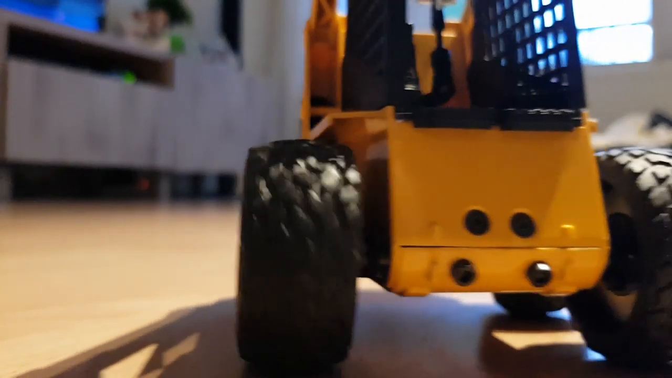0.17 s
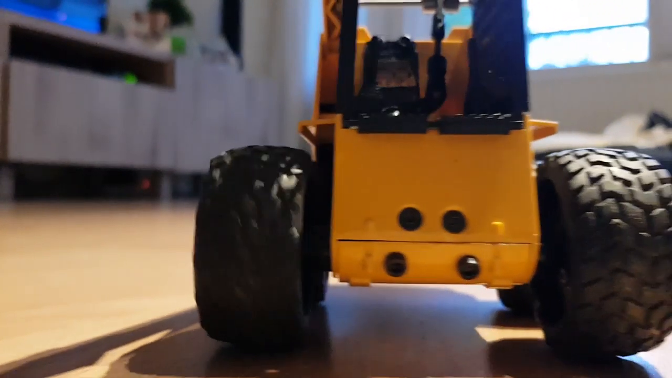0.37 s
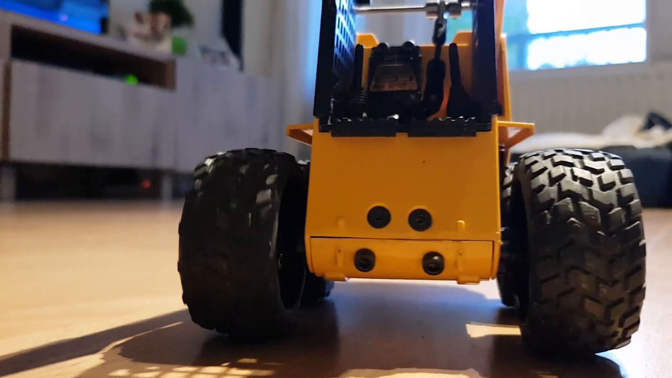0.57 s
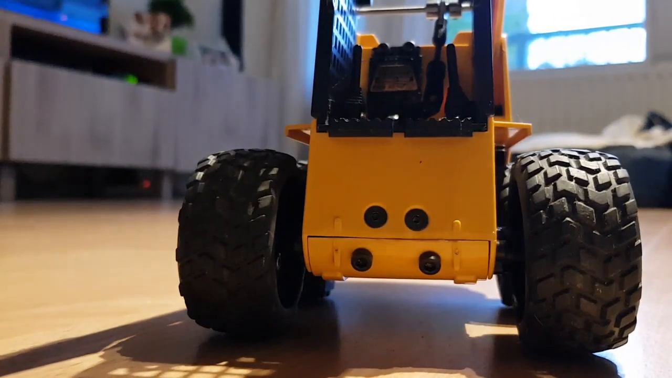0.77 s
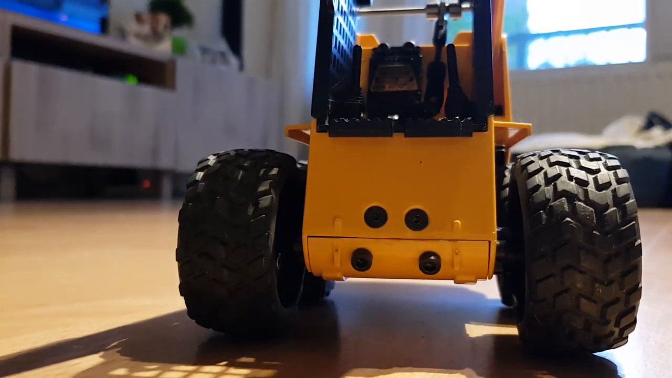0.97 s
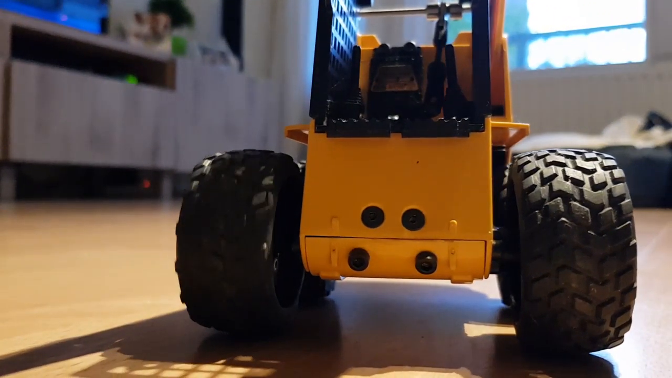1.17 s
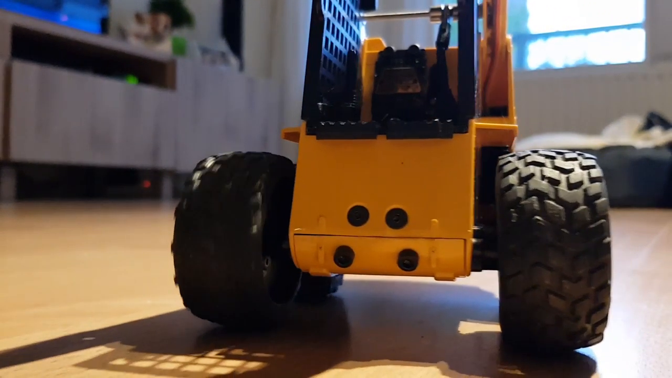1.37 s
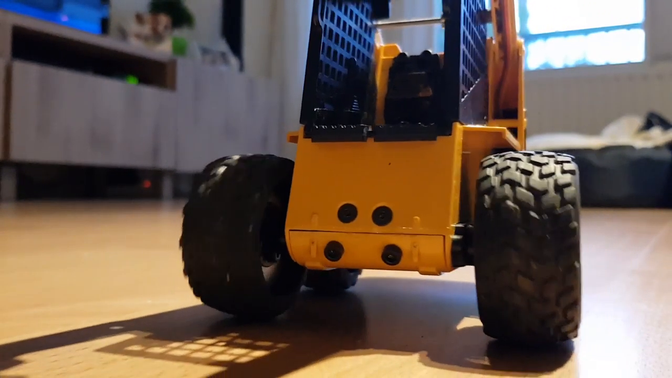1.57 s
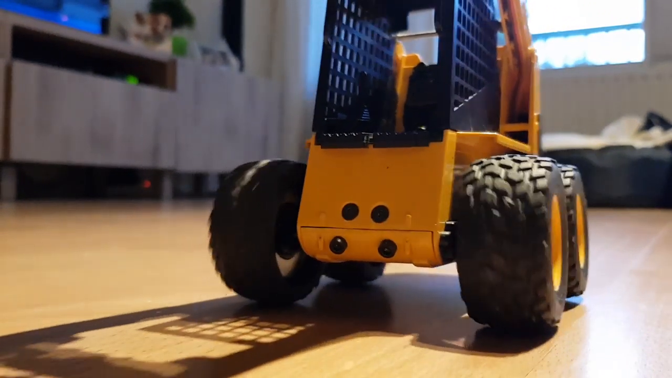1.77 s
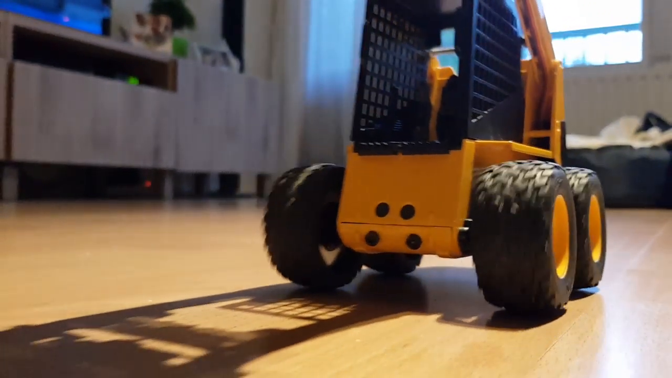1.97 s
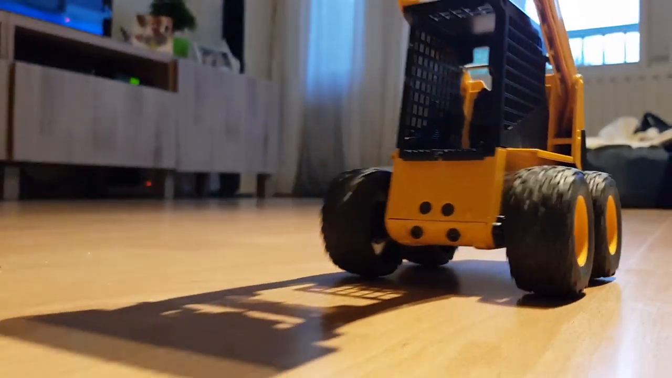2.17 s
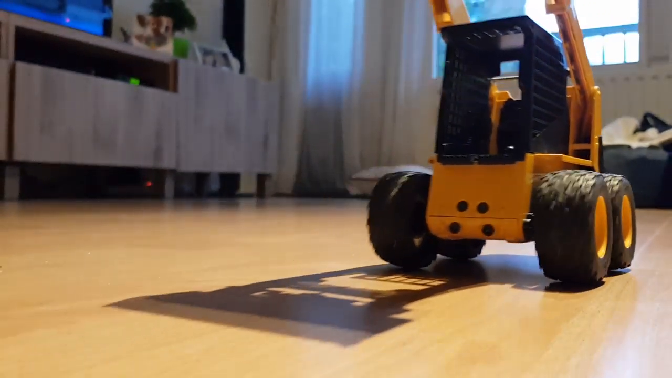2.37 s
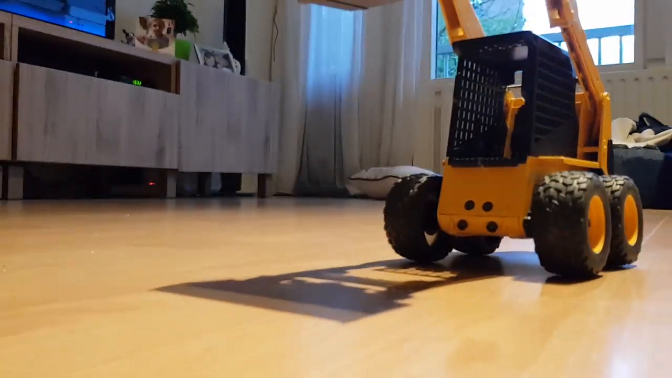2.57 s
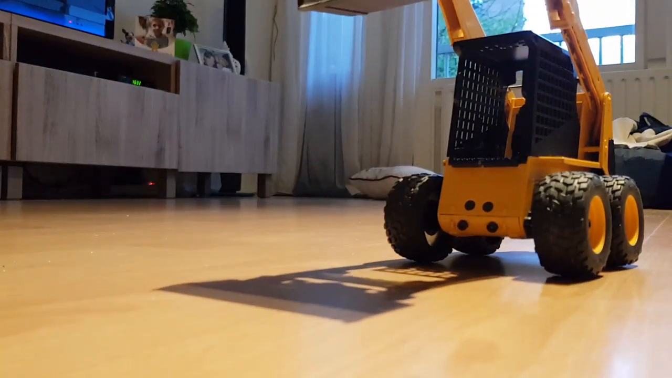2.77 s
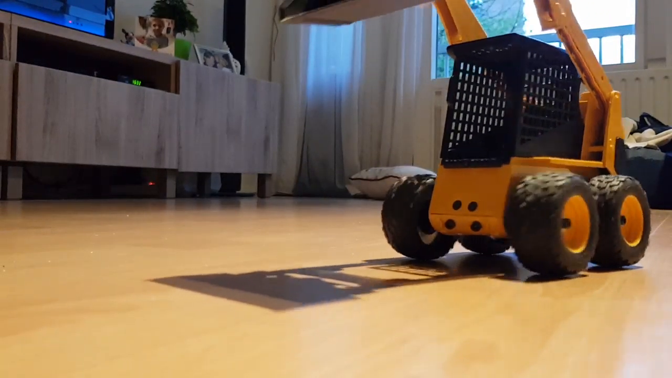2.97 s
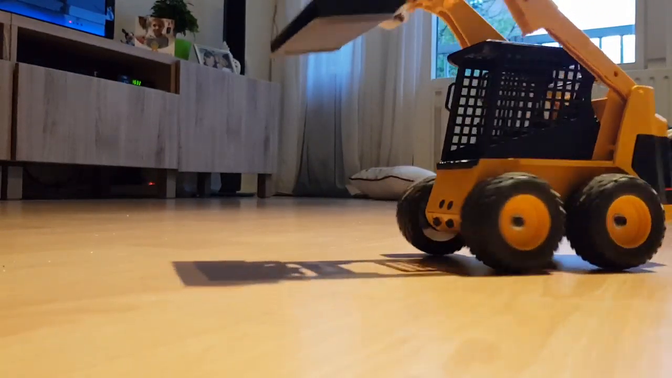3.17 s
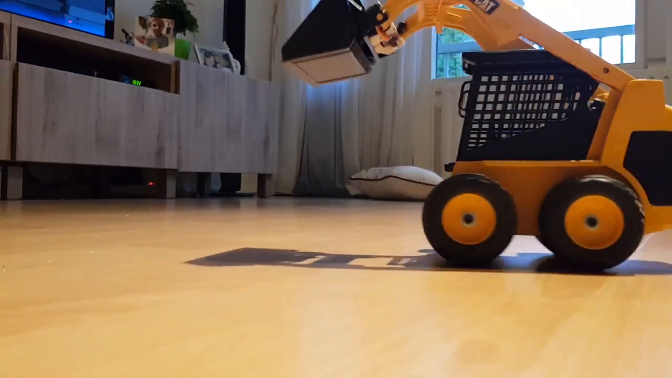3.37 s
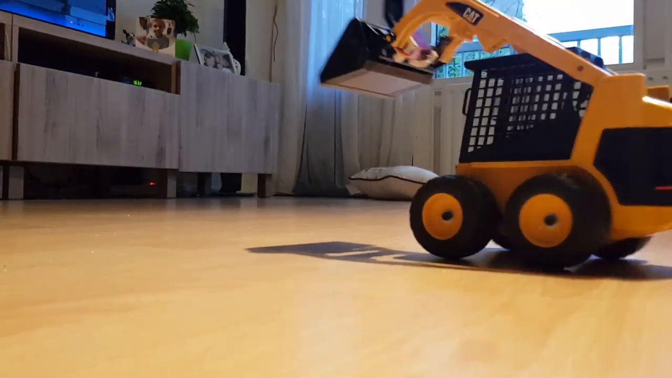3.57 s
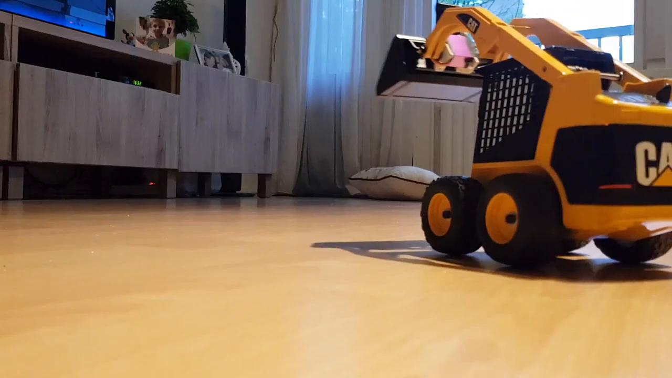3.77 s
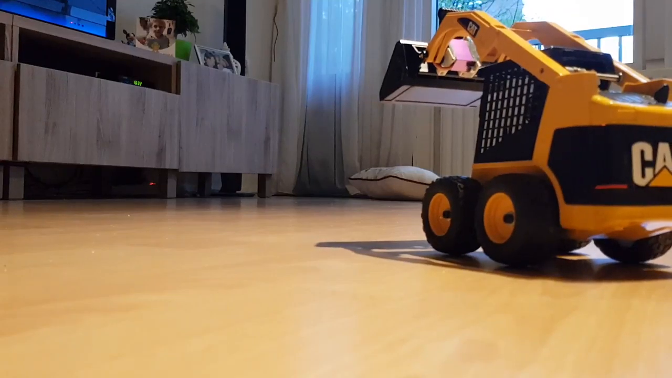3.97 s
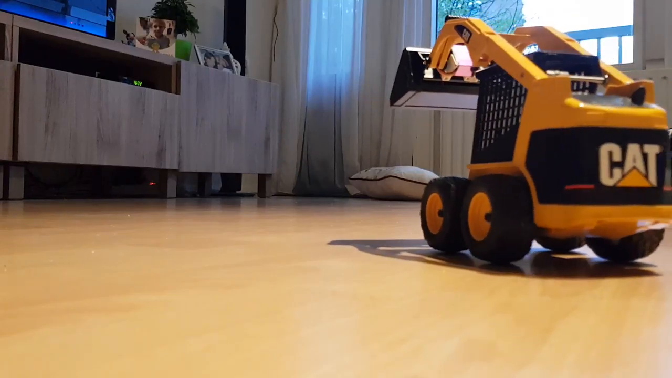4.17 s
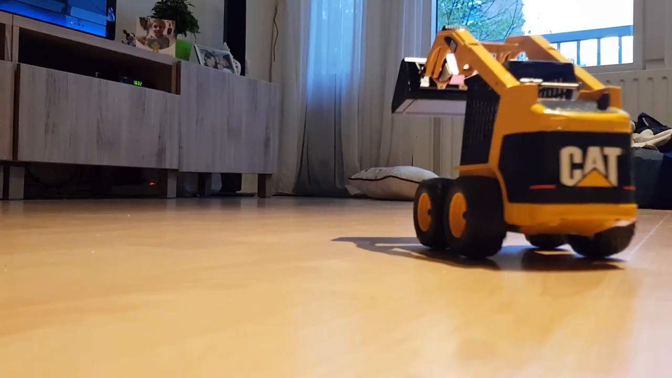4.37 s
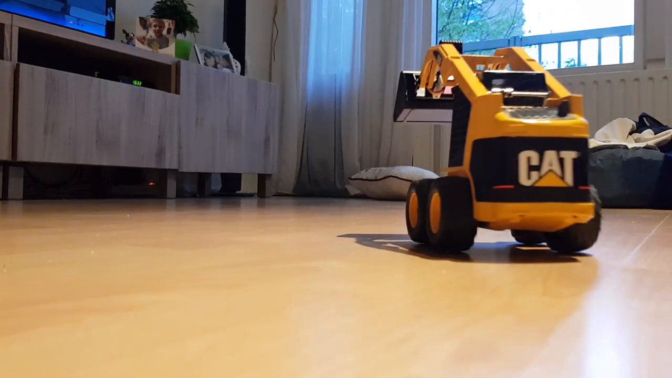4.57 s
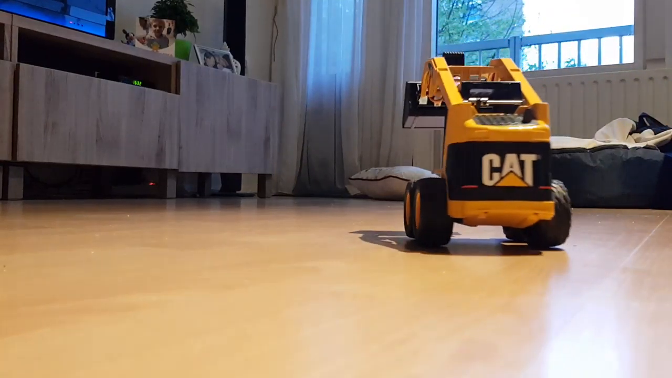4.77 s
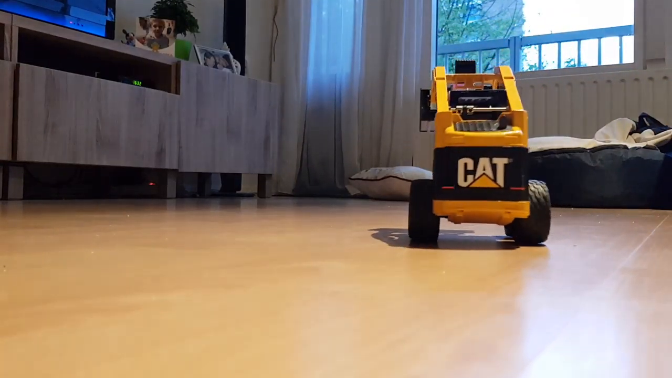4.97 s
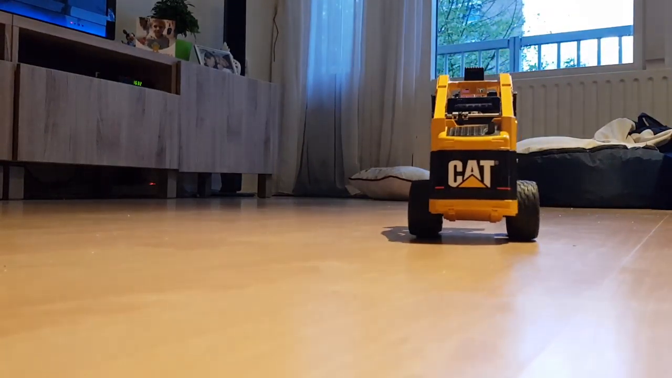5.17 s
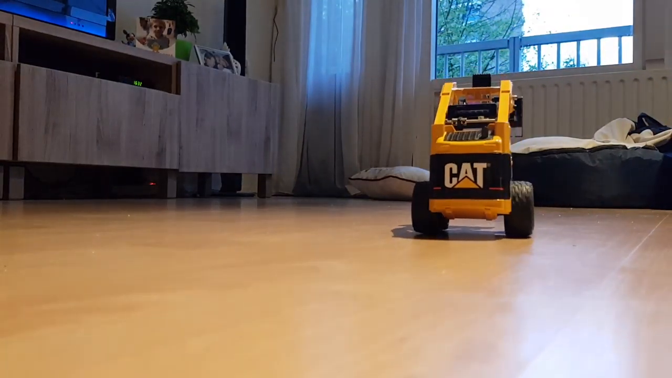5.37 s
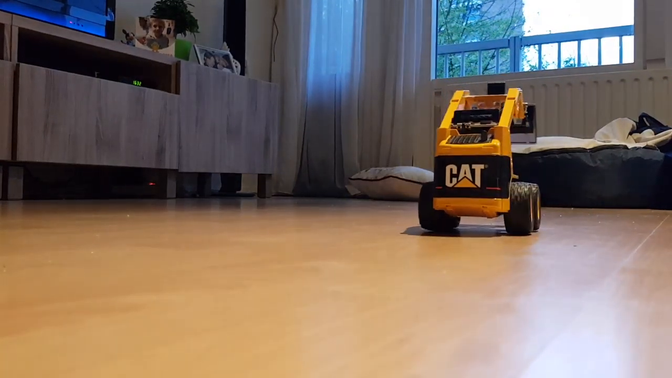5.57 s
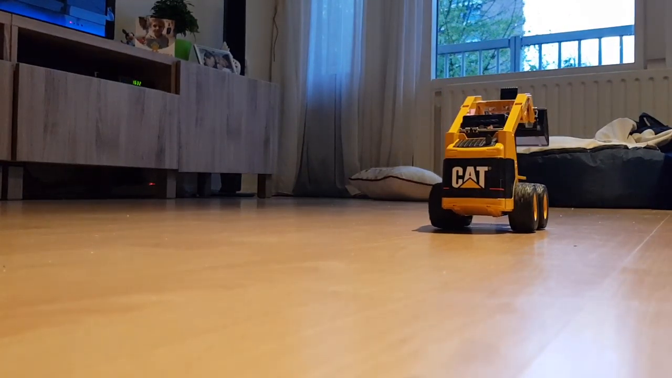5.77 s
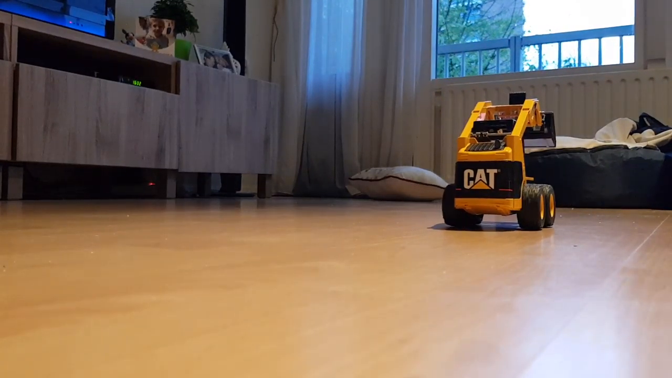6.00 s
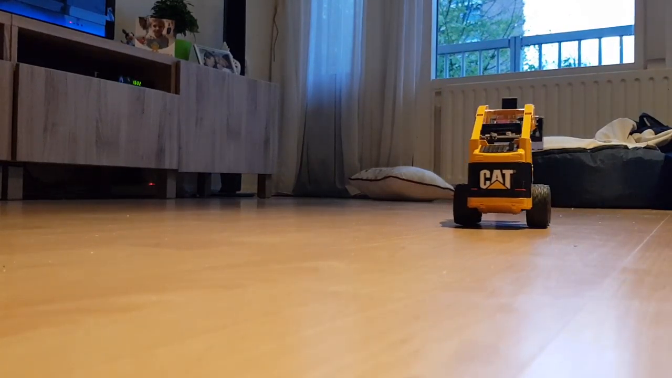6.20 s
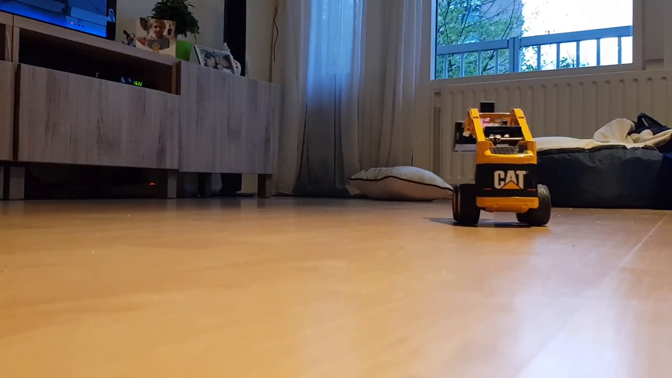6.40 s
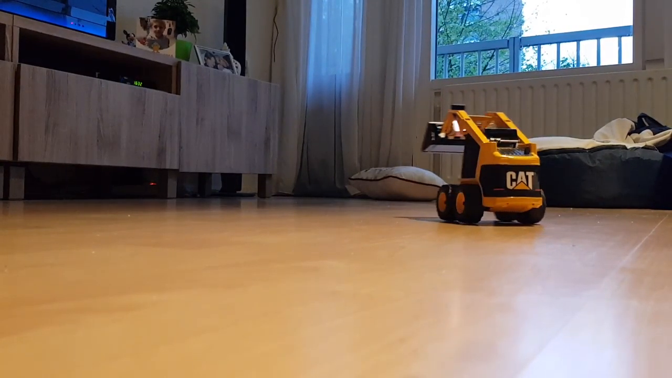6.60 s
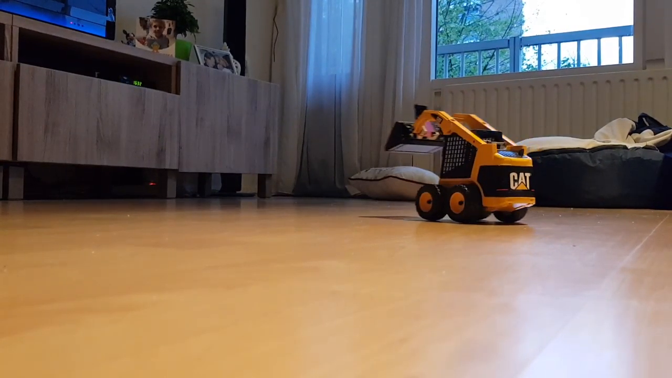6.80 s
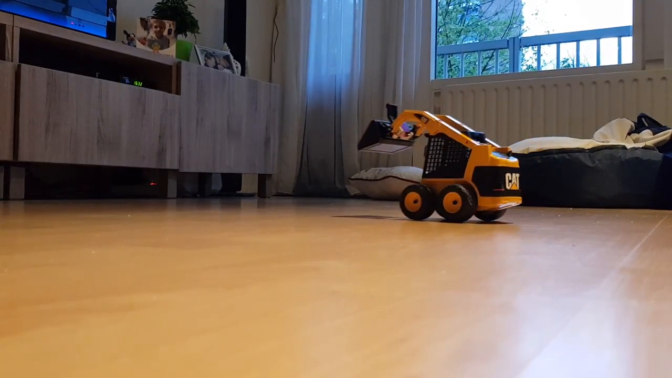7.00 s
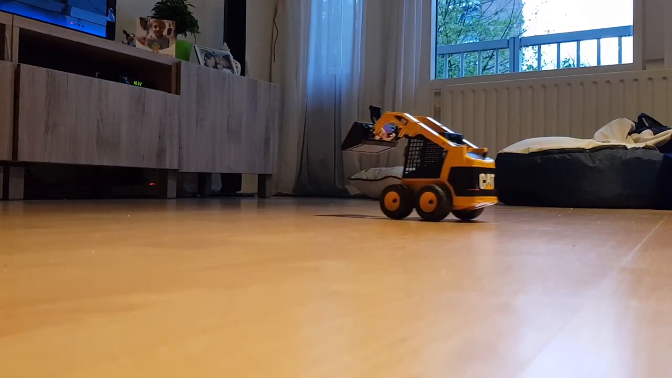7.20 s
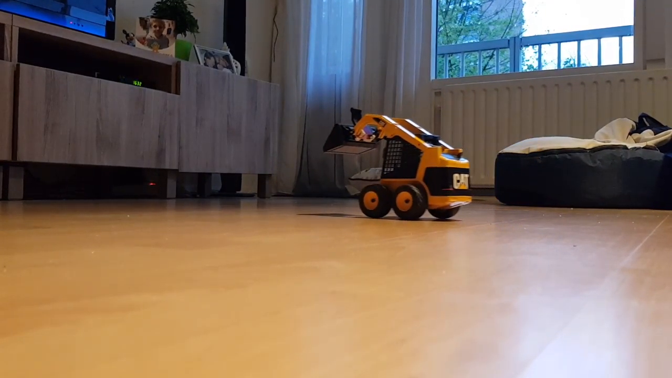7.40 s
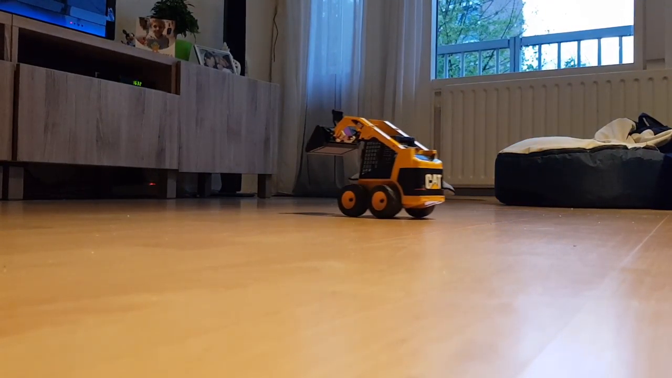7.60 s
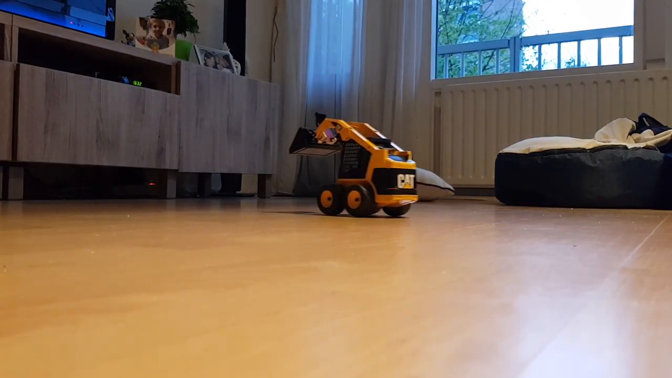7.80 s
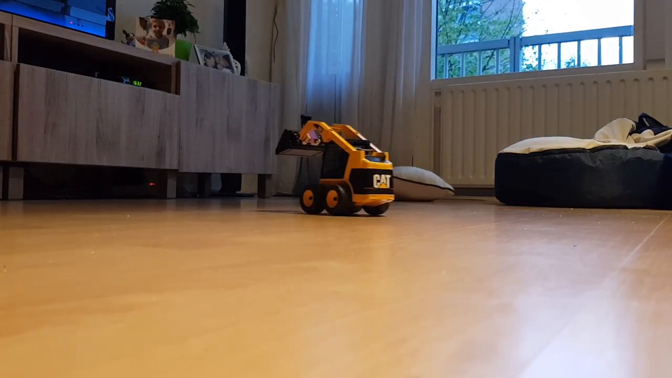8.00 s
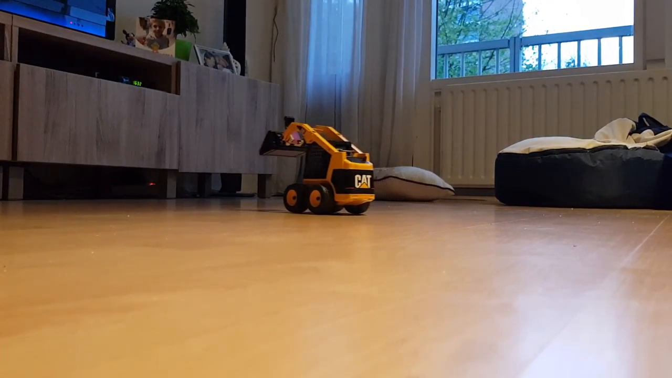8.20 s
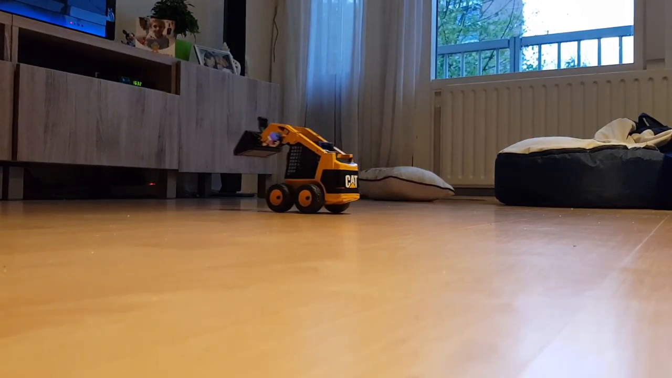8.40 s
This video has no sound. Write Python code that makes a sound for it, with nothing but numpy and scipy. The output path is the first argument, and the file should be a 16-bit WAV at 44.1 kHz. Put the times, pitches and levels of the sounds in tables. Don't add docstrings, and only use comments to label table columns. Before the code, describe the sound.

Plastic gear chatter and thin electric motor whine surge, pause three times, then run on longer as a remote-controlled toy drives away over laminate.

```python
import sys
import numpy as np
from scipy import signal
from scipy.fft import rfft, irfft, next_fast_len
from scipy.io import wavfile
from scipy.ndimage import uniform_filter1d, map_coordinates

SR = 44100
rng = np.random.default_rng(int(sys.argv[2]) if len(sys.argv) > 2 else 0)


def store_pcm(level_fs):
    pcm = np.round(np.clip(level_fs, -1, 1) * 32767).astype(np.int16)
    wavfile.write(sys.argv[1], SR, np.atleast_2d(pcm).T)


def gain_from_decibels(decibels):
    exponent = np.asarray(decibels, float) / 20
    return 10 ** exponent


N = 372644
T = np.arange(N) / SR
STEP = 16

# pitch_hz, density_db (per Hz)
CLATTER = [(88, -33), (150, -19), (315, -18), (555, -10.5), (716, -17), (854, -15.5), (1040, -11.5),
           (1190, -6.5), (1870, -4.5), (2140, -3), (3490, -2), (5460, -2), (7920, 1.5), (10800, 3.5),
           (16000, -7.5)]
# pitch_hz, width_hz, lift_db
CASING = [(520, 280, 2.5), (1172, 32, 3), (1593, 83, 6.5), (1900, 250, 4), (2600, 480, 2.5), (3400, 380, 2),
          (7900, 910, 4.5), (10000, 310, 1)]


def tooth_impacts():
    size = next_fast_len(N)
    hz = np.arange(size // 2 + 1) * SR / size
    chance, strength, scrape = rng.random(N), rng.exponential(size=N), rng.standard_normal(N)
    hits = (chance < 2500 / SR) * gain_from_decibels(1.55 * np.minimum(strength, 4)) * np.sign(scrape)
    throb_db = 0.45 * walk(14) + 0.051 * walk(30) + 1.48 * walk(200)
    drive = (level(hits, -2.0) + np.roll(scrape, 99)) * gain_from_decibels(throb_db)
    lift_db = sum(db / (1 + (2 * (hz - centre) / width) ** 2) for centre, width, db in CASING)
    return rfft(drive, size) * colour(CLATTER, size) * gain_from_decibels(lift_db)


# time_s, speed_db (as tooth force), load_db (on the tyres)
RUNS = [
    [(0, -11.5, 7.5), (.14, -3.5, 2.5), (.4, 2, -1), (.68, -13.5, 1.5), (.8, -55, -34)],
    [(1.08, -24, 5), (1.27, -11.5, 3), (1.41, -1.5, 0), (1.6, -1, 1.5), (1.95, 8, 0.5), (2.04, 4, 2),
     (2.28, 8.5, 0.5), (2.52, 2.5, 1.5), (2.68, -22.5, -2)],
    [(2.82, -27, 9.5), (3.01, 1, 1), (3.22, 2.5, 1.5), (3.36, 0.5, 4), (3.72, -0.5, 3), (3.81, -11.5, 1),
     (3.89, -31, -17)],
    [(3.97, -20, 5), (4.21, -9.5, 3.5), (4.42, 0.5, 4), (5.3, 1.5, 1.5), (5.98, 2.5, 0), (6.5, 1, -4.5),
     (6.97, -0.5, -4), (7.51, -1, 0.5), (8.45, 3.5, -2)],
]
PART_HZ = [550, 1800, 4300, 8300]
# speed_db_per_db, load_db_per_db, trim_db
ANSWER = [(1, 0.83, -0.5), (0.45, 1.46, -0.2), (0.5, 0.58, 0.07), (0.97, -0.16, -2)]
# time_s, treble_db (highest facing the phone)
PLACE = [(0, 3), (.5, 0.5), (1.6, 3.5), (2.2, -1.5), (3.2, 0.5), (3.95, 3), (4.4, -0.5), (5.2, -4.5),
         (6.3, -3), (7.2, -7), (7.7, -3), (8.45, -9)]
# start_s, end_s
RESTS = [
    (.735, 1.06),
    (2.69, 2.865),
    (3.885, 4.02),
]


def clatter():
    spectrum = tooth_impacts()
    size = next_fast_len(N)
    hz = np.arange(size // 2 + 1) * SR / size
    slow = T[::STEP]
    s, speed_db, load_db = np.concatenate(RUNS).T
    motion = [np.interp(slow, s, speed_db), np.interp(slow, s, load_db), np.ones(len(slow))]
    change_db = np.array(ANSWER) @ motion
    facing_db = np.interp(slow, *np.transpose(PLACE))
    out = 0
    for step in range(27):
        centre = 180 * 2 ** (step / 4)
        window = np.clip(1 - 4 * np.abs(np.log2((hz + 1) / centre)), 0, 1)
        place = np.interp(np.log(centre), np.log(PART_HZ), np.arange(4))
        share = np.clip(1 - np.abs(np.arange(4) - place), 0, 1)
        top_db = facing_db * np.clip(np.log2(centre / 9000) / .5, 0, 1)
        band_db = share @ change_db + top_db + 1.3 * coarse_walk(3) + 1.2 * coarse_walk(18)
        out = out + irfft(spectrum * window, size)[:N] * np.interp(T, slow, gain_from_decibels(band_db))
    resting = uniform_filter1d(sum((T > a) * (T < b) * 1. for a, b in RESTS), size=900)
    return level(slide(out) * gain_from_decibels(-9 * resting), -30)


# time_s, centre_hz, lift_db
RIDGES = [
    [(0, 4660, 5), (.55, 4200, -9)],
    [(1.3, 3400, 9.5), (1.7, 3370, 2), (2.15, 4900, 8.5), (2.35, 4830, 1)],
    [(1.7, 3900, 6), (1.9, 6200, -3), (2.05, 6000, 1)],
    [(1.8, 3400, 8), (2, 3700, 2), (2.27, 4480, 7.5), (2.5, 3440, 4)],
    [(1.2, 7500, 2.5), (1.95, 8270, 7), (2.22, 7000, 4.5)],
    [(1.9, 10100, 2), (2.25, 11250, 6), (2.5, 10400, 3.5)],
    [(3, 3540, 5), (3.3, 3915, 7.5), (3.5, 3327, 3), (3.7, 3750, 6)],
    [(3.1, 5400, 8), (3.3, 5980, 9.5), (3.5, 6330, 0), (3.72, 5740, 6)],
    [(4.45, 4430, 5), (4.7, 4830, 10), (5, 4600, 6), (5.4, 4870, 3), (5.62, 5425, 7)],
    [(5.9, 4610, -0.5), (6.5, 4300, 11), (6.72, 4700, 4), (7, 3510, 6.5), (7.2, 3620, 7), (7.45, 4040, 4)],
    [(7.75, 5420, 5.5), (8.45, 5400, 3.5)],
    [(3.9, 3280, 26), (4.08, 3400, 3)],
    [(2.9, 2260, 7), (2.96, 2200, 1)],
    [(.1, 3650, 9), (.35, 4000, 7), (.5, 3800, 3)],
    [(3.05, 10460, 1), (3.2, 10600, 4)],
    [(6.05, 2500, -1), (6.35, 2600, 2)],
    [(1.4, 1492, 0), (1.75, 1574, 8), (1.87, 1740, 17)],
    [(4.3, 7960, 3), (4.6, 8340, 2)],
    [(4.6, 1143, 5), (5.9, 1157, 5)],
    [(4.3, 3550, 5), (5.7, 3610, 2)],
    [(6.75, 2710, 5), (6.95, 2070, 14)],
    [(2.05, 12400, 6), (2.45, 12500, 1)],
    [(8.2, 6290, -5), (8.45, 5900, 9)],
]
# time_s, centre_hz, lift_db
NOTCHES = [
    [(1.6, 2180, -16.5), (2.15, 2170, -3), (2.55, 2380, -18)],
    [(2.83, 1880, -12), (3, 2440, 4), (3.3, 2250, -15.5), (3.65, 2310, -15)],
    [(.15, 4750, -8), (.4, 4580, -5)],
    [(2.95, 7000, 5), (3.75, 7040, -3.5)],
    [(4.25, 4110, -1.5), (5.5, 4050, -3)],
    [(4.6, 2110, -9), (6, 2130, -6)],
    [(6.15, 3400, -3), (6.5, 3106, -12), (6.85, 3230, -1)],
    [(6.85, 5150, 5), (7.1, 4770, -5.5), (7.4, 5160, -3)],
    [(4.75, 8660, 4), (5.15, 8130, -4)],
    [(6.95, 7900, -1.5), (7.3, 7900, -2)],
    [(6.95, 9600, -2.5), (7.3, 9400, -2)],
    [(6.25, 1102, -20), (7.05, 1130, -20)],
]
# start_s, length_s, centre_hz, lift_db
RASPS = [
    (4.15, 0.036, 6200, 11),
    (4.28, 0.084, 6240, 11),
    (4.39, 0.06, 6150, 15),
    (4.54, .08, 6360, 10),
]


def slide(x):
    hz, s, cells = signal.stft(x, SR, nperseg=512)
    width = 0.05
    lift_db = 0
    rasps = [[(a, f, db), (a + long_s, f, db)] for a, long_s, f, db in RASPS]
    for tables, fade_s in ((RIDGES + NOTCHES, 0.087), (rasps, .008)):
        for at, centre, db in map(np.transpose, tables):
            edge = np.clip(1 + np.minimum(s - at[0], at[-1] - s) / fade_s, 0, 1)
            distance = (hz[:, None] / np.interp(s, at, centre) - 1) / width
            lift_db = lift_db + edge * np.interp(s, at, db) * np.exp(-distance ** 2)
    return signal.istft(cells * gain_from_decibels(lift_db), SR, nperseg=512)[1][:N]


# start_s, fastest_s, end_s, pitch_hz, level_db
TYRE_GROWL = [
    (1.9, 2.1, 2.5, 460, -55),
    (3.05, 3.6, 3.84, 580, -51),
    (4.4, 4.9, 5.9, 550, -56),
]


def tyre_growl():
    tables = arcs(TYRE_GROWL, (.07, 1.3, .01, .17), (-5, -8))
    return whine(tables, [(1, -6.5), (.9, -10.5), (1.12, -8.5)], 0.0249, 7.0)


# time_s, pitch_hz, level_db
PINION = [
    [(.1, 3400, -50), (.4, 3337, -49), (.68, 3450, -55)],
    [(1.3, 3510, -63), (1.65, 3400, -50), (1.78, 3730, -52), (1.87, 3930, -39.5), (2.02, 3970, -47)],
    [(2.05, 4873, -57), (2.2, 5040, -49), (2.35, 4900, -48)],
    [(3.1, 3570, -60), (3.3, 3860, -60), (3.7, 3794, -44)],
    [(4.45, 4540, -44), (4.75, 4750, -57), (5.25, 4480, -63)],
    [(5.3, 3567, -58), (5.7, 3490, -68)],
    [(6.95, 3450, -49), (7.2, 3640, -55), (7.45, 3940, -62)],
    [(7.7, 5290, -51.5), (8.45, 5335, -54)],
]
# ratio, level_db
PINION_LINES = [(.89, -3), (.955, -7), (1, 0), (1.04, -6), (1.09, -8)]


def pinion_whine():
    return whine(PINION, PINION_LINES, .007, 3.2)


# time_s, mesh_hz, level_db
LOW_WHINE = [
    [(4.67, 800, -52), (4.714, 863, -47.5), (4.83, 853, -48), (4.956, 850, -45), (5.0, 806, -59.5),
     (5.046, 822, -46), (5.08, 835, -67)],
    [(5.3, 805, -58), (5.378, 844, -47), (5.42, 867, -49), (5.534, 854, -48), (5.63, 920, -46),
     (5.69, 850, -48), (5.77, 874, -56)],
    [(5.93, 780, -48), (5.97, 848, -51.5), (6.01, 860, -47), (6.052, 790, -54), (6.09, 770, -60)],
    [(7.59, 810, -57), (7.644, 864, -49), (7.718, 907, -48.5), (7.786, 892, -53), (7.872, 921, -47),
     (7.91, 855, -45), (7.97, 876, -71)],
]
# ratio, level_db
THREE_POLE = [(1, 0), (4 / 3, -5), (2.2, -16), (3.02, -4), (2.8, -14)]


def low_whine():
    return whine(LOW_WHINE, THREE_POLE, .008, 2.0)


# time_s, mesh_hz, level_db
SURGE = [
    [(1.87, 1180, -52), (1.9, 1280, -39), (1.955, 1640, -39)],
    [(1.96, 1170, -55), (1.985, 1195, -41), (2.15, 1420, -39), (2.29, 1545, -38), (2.37, 1400, -43),
     (2.47, 1220, -47)],
]
# ratio, level_db
SIX_BEAT = [(1 / 6, -26), (1 / 2, -16.5), (1, 0), (3 / 2, -9), (5 / 2, -16), (3, -15)]


def surge():
    return whine(SURGE, SIX_BEAT, 0.00493, 2.5)


# time_s, mesh_hz, level_db
MID_WHINE = [
    [(.1, 1480, -57.5), (.2, 1525, -41), (.38, 1568, -40.5), (.55, 1500, -51.5)],
    [(1.38, 1514, -47), (1.6, 1489, -43), (1.78, 1617, -48), (1.92, 1890, -44), (2.2, 1945, -47)],
    [(2.9, 1340, -55), (2.98, 1376, -43), (3.1, 1490, -41), (3.3, 1627, -41.5), (3.5, 1644, -44),
     (3.7, 1720, -45), (3.8, 1690, -62)],
    [(4.4, 1540, -84), (4.65, 1604, -46), (5.0, 1600, -53.5), (5.5, 1582, -52)],
]
# ratio, level_db
WORN_MESH = [(.965, -10), (1, -3), (1.035, -10), (1.23, -9), (1.72, -11), (2.3, -12), (2.4, -14)]


def mid_whine():
    return whine(MID_WHINE, WORN_MESH, 0.0072, 1.8)


# start_s, fastest_s, end_s, mesh_hz, level_db
HIGH_WHINE = [
    (.1, .2, .55, 1890, -43),
    (1.38, 1.45, 1.75, 1990, -45),
    (4.42, 4.92, 5.22, 1945, -46),
    (5.22, 5.45, 5.62, 1930, -47),
    (5.62, 6.2, 6.62, 1945, -46),
    (6.62, 6.72, 6.92, 1905, -51),
    (6.95, 7.05, 7.3, 1640, -52),
    (7.3, 7.4, 7.5, 2050, -50),
    (7.5, 7.95, 8.3, 1885, -52),
]
# ratio, level_db
TRUE_MESH = [(.965, -13), (1, 0), (1.035, -12), (1.65, -14), (2.3, -14), (2.4, -9)]


def high_whine():
    return whine(arcs(HIGH_WHINE, (.04, 1.5, .01, .12), (-4, -4)), TRUE_MESH, .012, 3.2)


# start_s, fastest_s, end_s, mesh_hz, level_db
TOP_WHINE = [
    (.08, .12, .58, 2704, -45),
    (4.68, 4.74, 4.95, 2640, -45),
    (5.3, 5.45, 5.88, 2620, -46),
    (5.9, 6.2, 6.45, 2530, -44),
    (6.45, 6.75, 6.85, 2657, -45),
    (7.7, 7.8, 8.1, 2700, -52),
    (8.13, 8.2, 8.3, 2560, -47),
    (8.33, 8.39, 8.45, 2850, -44),
]
# ratio, level_db
CLUSTER = [(0.902, -11), (.96, -8), (1, 0), (1.05, -8), (1.12, -10)]


def top_whine():
    return whine(arcs(TOP_WHINE, (.07, 1.3, .01, .17), (-7, -7)), CLUSTER, .008, 2.8)


# start_s, fastest_s, end_s, pitch_hz, level_db
AXLE_HUM = [
    (5.67, 5.75, 5.9, 240, -62),
    (5.92, 6.2, 6.3, 280, -63),
    (6.58, 6.68, 6.93, 261, -60),
    (7.45, 7.84, 8.1, 268, -62),
]


def axle_hum():
    tables = arcs(AXLE_HUM, (.15, 1.5, .02, .12), (-5, -8))
    return whine(tables, [(1, -3.5), (2, -5.0)], 0.01104, 3.9)


def whine(tables, orders, wobble, rough_db):
    flutter = 1 + wobble * walk(40) + wobble * walk(9)
    hz = np.zeros(N)
    for rows in tables:
        hz += np.interp(T, *np.transpose(rows)[:2]) * (T >= rows[0][0]) * (T < rows[-1][0])
    on, out = hz > 0, np.zeros(N)
    phase = 2 * np.pi * np.cumsum((hz * flutter)[on]) / SR
    for ratio, db in orders:
        rough = (walk(45) + .35 * walk(160))[on]
        out[on] += gain_from_decibels(db + rough_db * rough) * np.sin(ratio * phase)
    return np.sqrt(2) * out * sum(swell(rows) for rows in tables)


def arcs(pushes, arc, ends_db):
    below, curve, sag, sag_per_s = arc
    u = np.linspace(0, 1, 9)
    back, on = u[::-1], u[1:]
    tables = []
    for start, top, end, hz, db in pushes:
        times = np.r_[top - (top - start) * back, top + (end - top) * on]
        climb = 1 - below * back ** curve
        droop = 1 - (sag + sag_per_s * (end - top)) * on ** 1.5
        levels = db + np.r_[ends_db[0] * back ** 2, ends_db[1] * on ** 2]
        tables.append(np.transpose([times, hz * np.r_[climb, droop], levels]))
    return tables


def swell(rows, fade_s=0.0017):
    s, db = np.array(rows)[:, 0], np.array(rows)[:, -1]
    edge = np.minimum(T - s[0], s[-1] - T) / fade_s + (s[0] <= 0) + (s[-1] >= T[-1])
    return gain_from_decibels(np.interp(T, s, db)) * np.clip(edge, 0, 1) * (T >= s[0]) * (T <= s[-1] + .001)


# start_s, loudest_s, end_s, level_db, motor (0 left, 1 right, 2 right from behind)
CHOPS = [
    (.45, .66, .715, -51, 0),
    (.3, .605, .718, -48, 1),
    (.9213, 1.067, 1.4, -44, 0),
    (1.35, 1.5, 1.6, -48, 1),
    (2.8205, 2.835, 2.94, -49, 0),
    (2.85, 2.88, 2.97, -52, 1),
    (3.9435, 4.04, 4.26, -50, 2),
]
CHOP_TONES = [
    [-12, -6, 2, -5, -6, -12, -12, -20, -12, -13, -17],
    [-25, 4, 3, -4, -6, -20, 0, -20, -20, -28, -25],
    [-11, 0, -5, -3, -6, -9, -1, -18, -12, -14, -22],
]


def chopper():
    chop_hz = (1160, 1123, 1123)
    frame_s, pause_s, pause_sag = .02215, .0045, .06
    out = np.zeros(N)
    for start_s, top_s, end_s, top_db, motor in CHOPS:
        motor = round(motor)
        on = (T >= start_s) & (T < end_s)
        paused = (T[on] - start_s) % frame_s > frame_s - pause_s
        phase = 2 * np.pi * np.cumsum(chop_hz[motor] * (1 - pause_sag * paused)) / SR
        stack = sum(gain_from_decibels(db) * np.sin((k + 1) * phase + k * k) for k, db in enumerate(CHOP_TONES[motor]))
        rows = [(start_s, top_db - 8), (top_s, top_db), (end_s, top_db - 9)]
        out[on] += swell(rows, .001)[on] * stack * gain_from_decibels(-3 * paused)
    missed = 1. * (T > .9425) * (T < .9655)
    return out * (1 - uniform_filter1d(missed, size=60))


# start_s, end_s, level_db, loudest_hz
SERVO = [(0, 0.122, -38.5, 3110), (.5, 0.682, -76, 2460), (0.75, 0.758, -52.5, 1500),
         (0.754, 0.763, -41, 3160), (0.791, .806, -51, 2600), (0.81, 0.819, -50, 1450),
         (0.835, 0.915, -59, 2630), (0.939, 0.954, -47, 1410), (.958, .972, -48, 1460),
         (.977, .99, -48, 1490), (.993, 1.013, -51, 1500), (.9915, 1.008, -47.5, 2620),
         (2.702, 2.742, -53, 2780), (2.702, 2.742, -54, 1950), (2.702, 2.742, -68, 4100),
         (2.771, 2.835, -50, 1680), (2.8, 2.835, -52, 3600), (2.7585, 2.766, -50, 2900),
         (2.771, 2.835, -53, 2930), (3.78, 3.821, -42, 2120), (3.9017, 3.915, -51, 2720),
         (3.9025, 3.915, -55, 1800), (4.019, 4.039, -47, 2330), (4.07, 4.145, -39.5, 2020),
         (4.06, 4.145, -54, 2900), (4.12, 4.23, -46.5, 3540), (4.72, 4.76, -46, 2650),
         (8.16, 8.225, -42, 2760),
    (8.272, 8.335, -40, 2750),
    (8.272, 8.335, -41, 3060),
    (8.36, 8.42, -42, 3150),
    (8.425, 8.45, -44, 2600),
]
# pitch_hz, gain_db
SERVO_BODY = [(900, -12.5), (1200, -1.5), (1600, -9), (2100, 1.5), (2800, 2.5), (3700, -5), (4600, -7)]


def servo():
    servo_hz, stall_hz = 305.6, 270
    stall_start_s, stall_end_s = .78, 1.05
    out = np.zeros(N)
    twitches = [(s, s + .012, -49, 1480) for s in .835 + .0159 * np.arange(5)]
    bursts = SERVO + twitches
    multiple = np.arange(3, 16)[:, None]
    body_hz, body_db = np.transpose(SERVO_BODY)
    body = gain_from_decibels(np.interp(np.log(multiple * servo_hz), np.log(body_hz), body_db))
    unevenness = rng.standard_normal((len(bursts), 13, 1))
    for (start_s, end_s, db, top_hz), uneven in zip(bursts, unevenness):
        on = (T >= start_s) & (T < end_s)
        age = T[on] - start_s
        hz = multiple * (stall_hz if stall_start_s < start_s < stall_end_s else servo_hz)
        edge = np.clip(np.minimum(age / .001, (age[-1] - age) / .003), 0, 1)
        weight = np.exp(-(np.log(hz / top_hz) / 0.11) ** 2) + gain_from_decibels(-17) * body
        tones = weight * gain_from_decibels(2.0 * uneven) * np.sin(2 * np.pi * hz * age + 1.8 * uneven)
        out[on] += gain_from_decibels(db) * edge * np.sum(tones, 0)
    stalled = (T > stall_start_s) * (T < stall_end_s)
    return out * gain_from_decibels(2.2 * walk(250) * stalled)


# time_s, peak_db
TICKS = [
    (.727, -58),
    (.8541, -51),
    (.886, -51),
    (.896, -55),
    (2.7627, -36),
    (3.9046, -44),
]
# time_s, peak_db, pitch_hz
THUDS = [
    (1.152, -51, 503),
]


def creaks():
    out = np.zeros(N)
    for at_s, db in TICKS:
        for hz in (-3900, 4700, -5600, 6500, -7400, 8800, -10300, 11800, -13500):
            add(out, at_s, db - 3, hz, .007)
    for at_s, db, hz in THUDS:
        add(out, at_s, db, hz, .06)
    return out


def add(out, at_s, db, hz, t60):
    age = np.arange(int(t60 * SR)) / SR
    i = int(at_s * SR)
    out[i:i + len(age)] += gain_from_decibels(db) * np.sin(2 * np.pi * hz * age) * np.exp(-np.log(1000) * age / t60)


def room(x):
    t60_s, treble_t60_s, split_hz = .2, .12, 1300
    hold = 1024
    age = np.arange(int(.14 * SR)) / SR
    fade = np.sin(np.pi * np.arange(2 * hold) / (2 * hold))
    x = np.r_[np.zeros(hold), x, np.zeros(2 * hold)]
    common, left, right = rng.standard_normal((3, 24, len(age)))
    bass = signal.lfilter(*signal.butter(2, split_hz, fs=SR), common)
    treble = signal.lfilter(*signal.butter(2, split_hz, "high", fs=SR), [left, right])
    bass = bass * np.exp(-np.log(1000) * age / t60_s)
    treble = treble * np.exp(-np.log(1000) * age / treble_t60_s)
    echo = (bass + treble) * (age > .003)
    size = next_fast_len(2 * hold + len(age))
    patterns = rfft(echo / np.sqrt(np.mean(np.sum(echo ** 2, 2))), size)
    out = np.zeros((2, len(x) + size))
    for k, i in enumerate(range(0, N + hold, hold)):
        piece = rfft(x[i:i + 2 * hold] * fade, size)
        out[:, i:i + size] += irfft(piece * patterns[:, k % len(common)], size)
    return out[:, hold:hold + N]


# pitch_hz, density_db
QUIET = [(20, -9), (40, -16), (65, 1), (85, -12), (125, 0), (180, -9.5), (260, -17), (450, -24), (750, -30),
         (1300, -22), (3000, -10.5), (5000, -20), (10000, -25), (16000, -40)]


def quiet():
    size = next_fast_len(N)
    noise = rfft(rng.standard_normal((2, size)))
    mid, side = irfft(noise * colour(QUIET, size), size)[:, :N]
    side = 0.39 * side + signal.lfilter(*signal.butter(1, 1500, "high", fs=SR), side)
    hum_phase = 2 * np.pi * np.cumsum(95.7 * (1 + 0.063 * walk(25))) / SR
    hum = gain_from_decibels(-67 + 1.3 * walk(6.3)) * np.sin(hum_phase)
    return level(np.array([mid + side, mid - side]), -58) + hum


def level(x, db):
    return x * gain_from_decibels(db) / np.sqrt(np.mean(x ** 2))


def coarse_walk(rate):
    k = max(int(SR / STEP / rate), 1)
    values = rng.standard_normal(N // 100)[:N // STEP // k + 2]
    steps = np.repeat(values, k)[:len(T[::STEP])]
    return 1.3 * uniform_filter1d(uniform_filter1d(steps, k), k)


def walk(rate):
    return np.interp(T, T[::STEP], coarse_walk(rate))


def colour(points, size):
    hz, db = np.transpose(points)
    return gain_from_decibels(np.interp(np.log(np.arange(size // 2 + 1) * SR / size + 1), np.log(hz), db))


# time_s, left_lag_samples
LAG = [(0, -.5), (.6, -2), (1.0, -1), (1.7, -2), (2.25, 1), (2.8, 2.5), (3.2, 5), (3.9, 5.8), (4.1, 5.8),
       (4.5, 4.5), (5.2, 3.5), (6.2, 5), (6.8, 5), (7.25, 3), (7.75, 1), (8.45, 0)]


def scene():
    toy = clatter() + tyre_growl() + pinion_whine()
    deck = creaks() + low_whine() + surge() + axle_hum() + high_whine() + mid_whine() + top_whine()
    board = chopper() + servo()
    lag = np.interp(T, *np.transpose(LAG))
    pan_db = 3 - 0.44 * lag
    wet = np.clip(gain_from_decibels(-4 + 8 * T), 0, .76)
    direct = toy * np.sqrt(1 - wet ** 2) + deck
    ports = []
    for side in (1, -1):
        heard = delayed(direct, side * lag) + delayed(board, side * lag * .2)
        ports.append(heard * gain_from_decibels(side * pan_db / 2))
    sent = wet * (toy + gain_from_decibels(-10) * (deck + board))
    sent = signal.lfilter(*signal.butter(1, 700, "high", fs=SR), sent)
    return np.array(ports) + room(sent) + quiet()


def delayed(x, late):
    return map_coordinates(x, [np.arange(N) - late / 2], order=3)


def low_pass(x):
    return signal.sosfilt(signal.butter(12, 16650, fs=SR, output="sos"), x)


def record(dry):
    top_cut = signal.ellip(10, .2, 80, 15800, fs=SR, output="sos")
    mix = signal.sosfilt(top_cut, dry)
    return low_pass(mix)


dry = scene()
out = record(dry)
store_pcm(out)
```